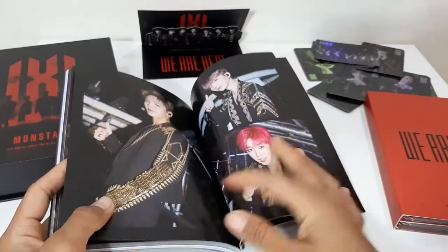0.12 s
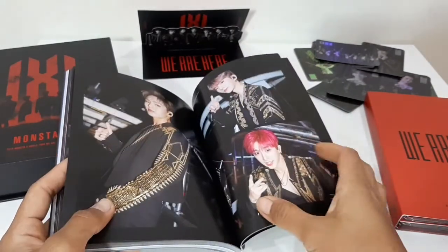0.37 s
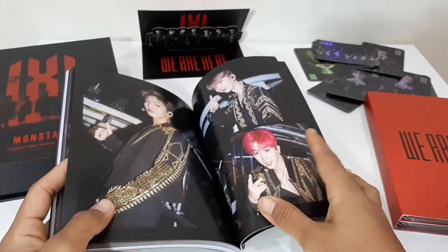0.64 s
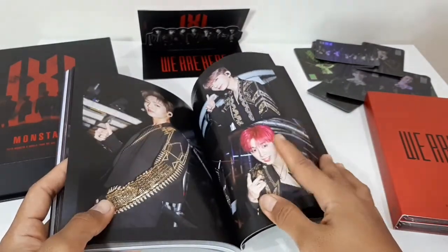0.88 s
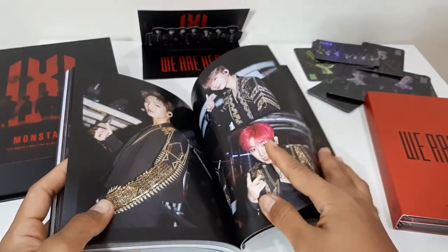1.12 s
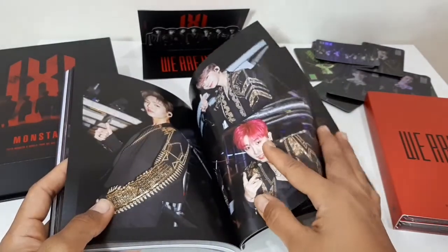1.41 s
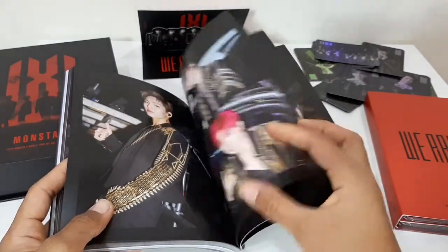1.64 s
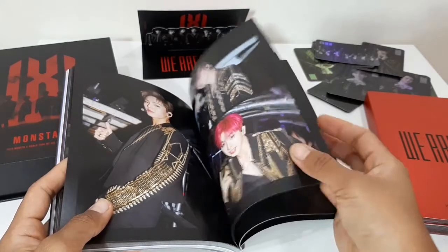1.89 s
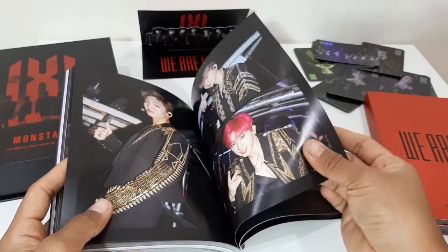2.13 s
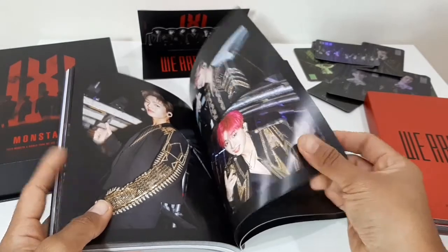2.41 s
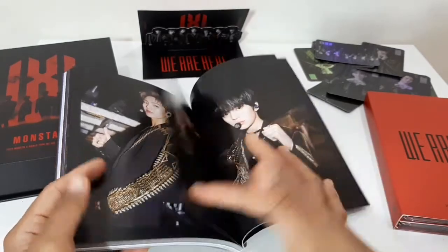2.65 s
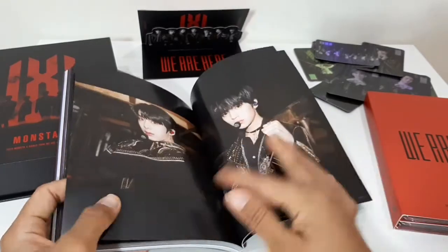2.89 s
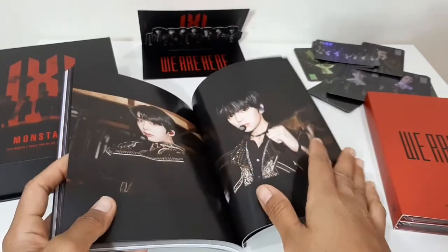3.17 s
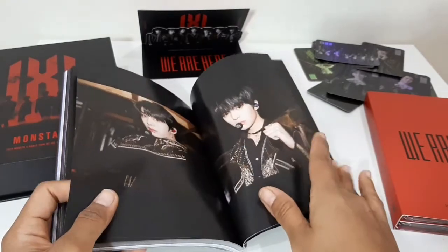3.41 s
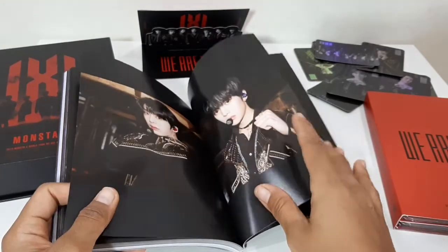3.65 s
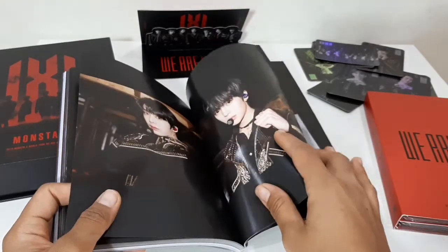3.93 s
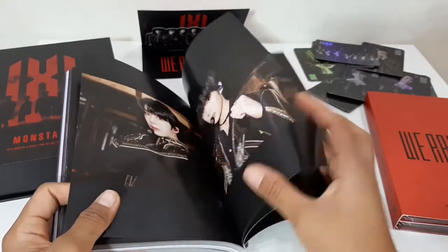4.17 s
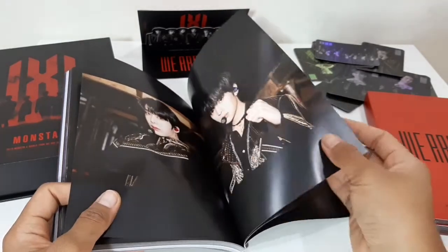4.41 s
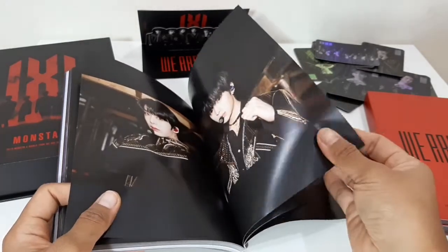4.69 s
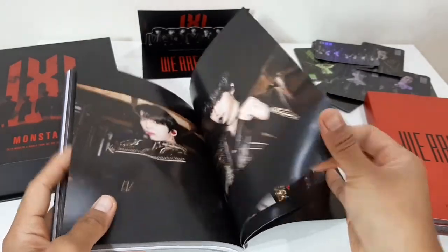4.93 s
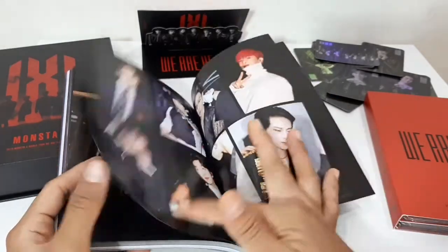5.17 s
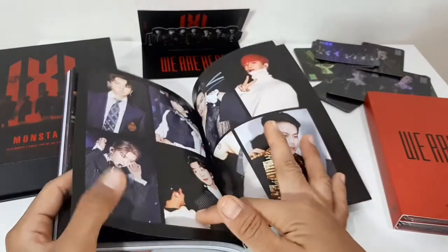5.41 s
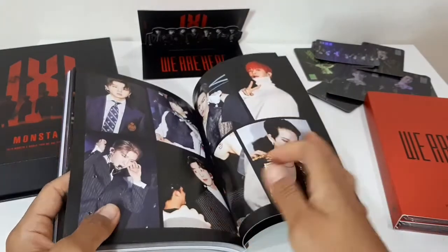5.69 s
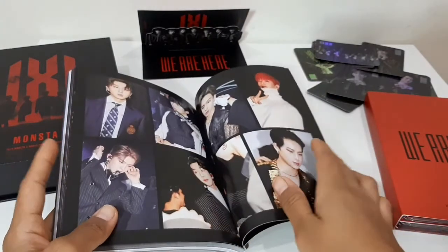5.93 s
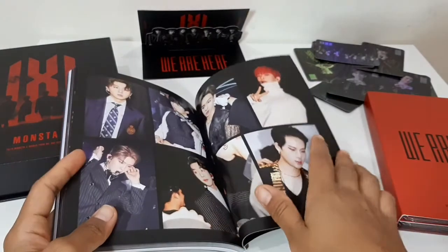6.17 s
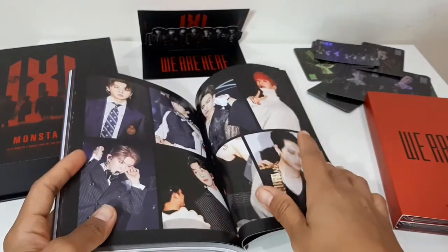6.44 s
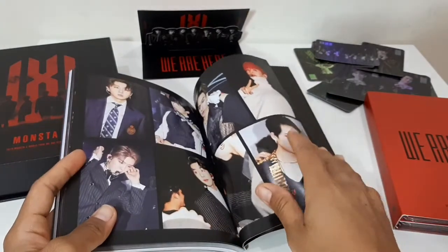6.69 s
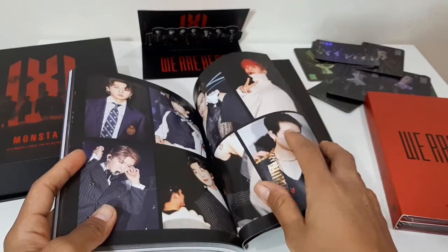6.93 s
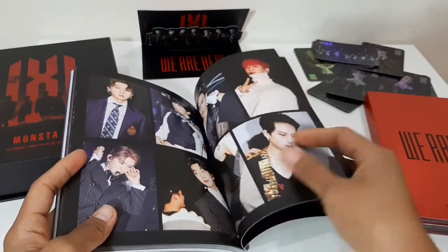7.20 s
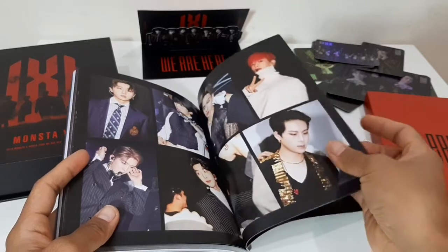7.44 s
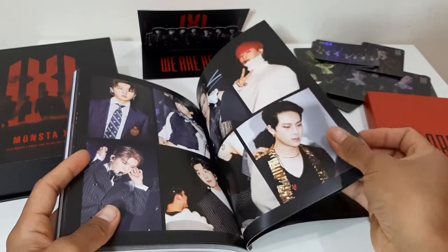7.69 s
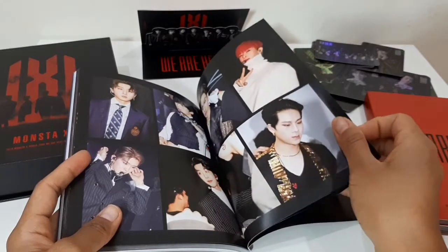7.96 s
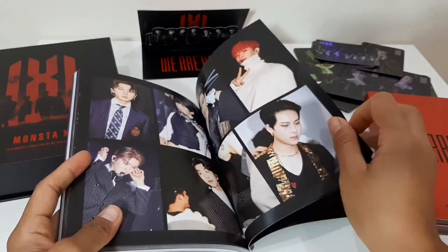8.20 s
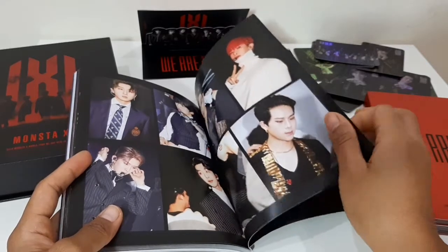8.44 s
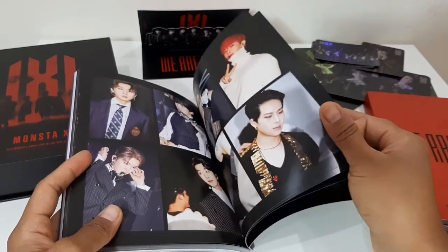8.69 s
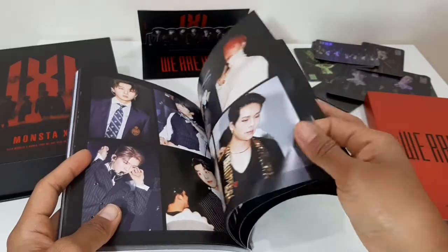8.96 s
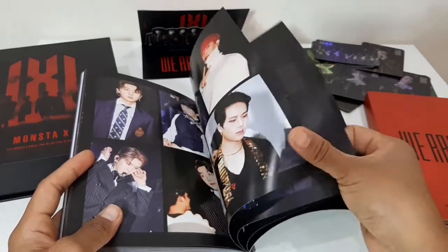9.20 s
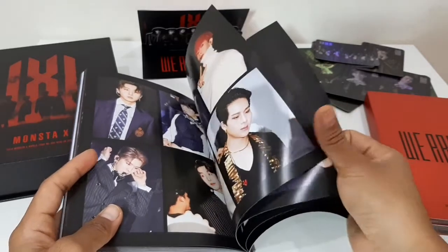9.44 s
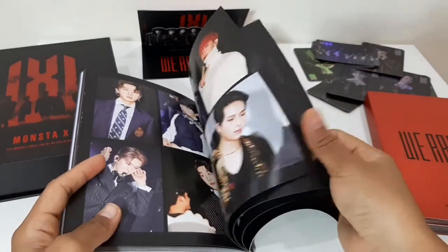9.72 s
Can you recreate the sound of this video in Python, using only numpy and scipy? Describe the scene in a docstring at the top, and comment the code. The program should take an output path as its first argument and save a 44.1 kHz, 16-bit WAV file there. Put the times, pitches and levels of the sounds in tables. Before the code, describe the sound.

A glossy, heavy-paged book is handled close to a stereo microphone in a quiet room. It opens with a brief soft rub, then very faint sliding until about 1.1 s. From 1.3 to 2.4 s fingers brush and lift a sheet, with dry ticks clustering around 1.6 to 2.3. Around 2.6 s it buckles in quick snaps, and at 2.8 comes the loudest crack with a hollow flop, followed by a duller crease at 3.1. Light rubs follow; grainy strokes at 4.2 to 4.9 lead into a second turn, snapping at 5.15 and swishing away by 5.5. A small tick at 5.6, then near-quiet finger sliding until 7.7. From there busy rubbing, bending and small snaps continue, with fuller swishes from 9 to the end. Soft hiss, short room reflections and a faint low hum, swelling slightly late, lie underneath.

```python
"""A table in a quiet room, a stereo microphone close to stiff glossy book pages as fingers rub, lift and turn them.
Strokes of finger or sheet are grainy filtered noise, with fuzzy resonances for the air between the pages.
Sheets buckle with snaps and slower creases, each a decaying tone, a noise crack, a flop of air and a table thud.
Random echoes stand for table and walls. Steady hiss, a low wavering hum and a faint drone lie underneath."""
import sys
import numpy as np
from scipy import signal
from scipy.io import wavfile
from scipy.ndimage import uniform_filter1d

SR = 44100
rng = np.random.default_rng(int(sys.argv[2]) if len(sys.argv) > 2 else 0)


def persist_wave(psi):
    """Save psi, clipped to +-1, as 16-bit WAV."""
    counts = np.round(np.clip(psi, -1, 1) * 32767).astype(np.int16)
    wavfile.write(sys.argv[1], SR, np.atleast_2d(counts).T)


def ratio(d):
    """dB to gain"""
    e = np.asarray(d, float) / 20
    return 10 ** e


N = 433944

# strokes of finger or sheet, before grain and dips; peak_s is the loudest moment, swell and fade span 20 dB:
# peak_s [s], level_db [dB], swell_ms [ms], fade_ms [ms], treble_tilt [dB per octave]
STROKES = [(0.061, -51.5, 139, 96, 0.5), (0.356, -65, 527, 53.5, 1), (0.685, -69, 264, 133.5, 5),
           (1.139, -63.5, 25, 42, -4.5), (1.356, -52.5, 43, 99.5, 0.5), (1.642, -52.5, 172, 101.5, -1),
           (1.837, -59.5, 179, 29, 1.5), (1.863, -56.5, 17, 114, 0), (1.936, -47, 31, 181, 2.5),
           (1.966, -49, 20, 42, 1.5), (2.252, -50.5, 13.5, 94.5, 1), (2.377, -57.5, 37.5, 90.5, -0.5),
           (2.564, -51, 55.5, 28.5, -2.5), (2.7, -56.5, 100, 228, -3.5), (2.655, -45, 5.5, 63.5, -1),
           (2.808, -34.5, 2.5, 86, -0.5), (2.836, -47.5, 12, 254.5, 0), (3.143, -44.5, 13.5, 72, -5.5),
           (3.184, -63, 196, 187, 5), (3.349, -58, 135, 154.5, 4), (3.841, -51.5, 164, 30, 2.5),
           (3.882, -61.5, 373, 199, 2), (4.234, -49, 19.5, 37, 6.5), (4.262, -47, 46, 123, 2.5),
           (4.435, -51.5, 107.5, 123, 1.5), (4.488, -54.5, 19, 394.5, -0.5), (4.649, -46, 39, 86.5, -0.5),
           (4.841, -55.5, 443, 87, 0), (4.849, -43.5, -2, 15, 0.5), (5.07, -44.5, 77.5, 98, -0.9),
           (5.164, -43.5, 3, 69.5, -3), (5.255, -46, 59, 246.5, 0.6), (5.511, -57, 393.5, 77, 0.5),
           (5.596, -52, 16, 95.5, 4.5), (5.729, -60, 53, 111.5, 0), (6.17, -60.5, 168, 170.5, 3.5),
           (6.366, -62.5, 27.5, 89.5, 3.5), (6.445, -66, 17, 142, -0.9), (6.726, -65.5, 48, 59, -5),
           (6.894, -58, 52.5, 79, 0), (7.088, -63, 292.5, 63, -1.5), (7.252, -65.5, 47.5, 117, 0),
           (7.402, -65, 49, 214, -1), (7.529, -62.5, 9, 701.5, 3.5), (7.743, -43.5, 29, 85.5, 1.8),
           (7.881, -53.5, 25, 130, -2.8), (7.98, -55, 14.5, 36.5, 5), (8.075, -48, 46.5, 99, 1),
           (8.168, -49.5, 16.5, 30, -4.5), (8.266, -53, 97, 67.5, -0.5), (8.309, -54.5, -1, 160, 0.5),
           (8.437, -48.5, 54, 73, -0.5), (8.568, -59.5, 188.5, 294, 0.5), (8.621, -44.5, 5.5, 49.5, -3),
           (8.983, -46, 145.5, 189.5, 1.3), (9.145, -52, 36.5, 85.5, -2.5), (9.235, -44, 14, 105, 1.4),
           (9.378, -45.5, 111, 79, -0.5), (9.51, -43, 59, 300, 2), (9.764, -49.5, 77, 205, 1)]
# spectrum of the sliding hiss: pitch_hz [Hz], relative level_db [dB per Hz]
RUB_SPECTRUM = [(180, -34.5), (300, -6), (756, -22.5), (1500, -4), (2500, -7), (2790, -4.5), (7730, -14.5),
                (12100, -25), (13500, -41.5)]
# a lifted sheet cups the air, before grain and dips; peak_s is the loudest moment, swell and fade span 20 dB:
# peak_s [s], swell_ms [ms], fade_ms [ms], low_hollow_level_db [dB], high_hollow_level_db [dB]
AIR_RINGS = [(0.0, 588, 273, -67, -72), (0.441, 28, 320, -92, -76.5), (0.658, 97, 147, -69, -79),
             (0.839, 48, 102, -70, -90), (1.138, 56, 102, -60.5, -71), (1.365, 41, 100, -66, -56),
             (1.656, 136, 73, -56.5, -51), (1.95, 24, 100, -54.5, -44), (2.141, 28, 66, -96, -62.5),
             (2.255, 12, 65, -50, -46.5), (2.563, 84, 324, -53.5, -49.5), (2.653, 99, 111, -49, -72),
             (2.809, 1, 75, -35, -55), (2.992, 109, 127, -60, -60), (3.136, -2, 70, -41, -53),
             (3.291, 191, 74, -58.5, -70), (3.451, 173, 33.5, -59, -66.5), (3.747, 57, 165, -54.5, -72),
             (3.827, 17, 76, -54.5, -58), (4.276, 13, 414, -63.5, -53.5), (4.662, 107, 254, -59, -58),
             (5.174, 159, 241, -51, -57), (5.516, 79, 66, -60.5, -67), (5.603, 4, 44, -48, -48),
             (5.734, 79, 212, -83, -60.5), (6.251, 326, 64, -67, -62.5), (6.727, 71, 87, -62.5, -66),
             (7.03, 103, 140, -57.5, -59.5), (7.25, 47, 107, -68, -67), (7.381, 14, 320, -63, -63),
             (7.748, 176, 124, -57.5, -49), (8.173, 597, 209, -58, -78), (8.46, 36, 93, -53.5, -59),
             (8.648, 247, 131, -61, -60), (8.985, 18, 288, -58, -60), (9.392, 82, 92, -55, -57),
             (9.55, 63, 255, -52.5, -47), (9.74, 22, 189, -61, -54)]
# drifting pitches of the two hollow resonances; the high one moves widely, the low one little:
# time_s [s], low_hollow_pitch_hz [Hz], high_hollow_pitch_hz [Hz]
HOLLOW_PITCHES = [(1.2, 885, 1200), (1.6, 800, 1960), (2.1, 800, 1313), (4.4, 890, 1390), (4.49, 900, 1800),
                  (4.9, 880, 1693), (5.1, 830, 1215), (9.84, 900, 1227)]
# half widths of the hollow resonances: low [Hz], high [Hz]
HOLLOW_HALF_WIDTHS_HZ = [145, 180]
# level of each hollow against the hiss of the stroke that stirs it: low [dB], high [dB]
STIRRED_HOLLOW_DB = [-21, -18]
STROKE_BEND, RING_BEND = 1.53, 1.2  # exponents; above 1 the top is rounded and the ends are abrupt
DIP_DB, DIP_MS = -1, 26  # deepest gain just before a snap or crease, time constant of its approach

# sudden buckles: start_s [s], level_db [dB, peak of the ring], pitch_hz [Hz],
# crack_level_db [dB against that peak], flop_level_db [dB]
SNAPS = [(1.6445, -31.5, 2230, -9, -55), (1.8069, -36.5, 2070, -2, -88), (1.856, -37, 1900, -1.5, -96),
         (1.927, -34, 2060, 5.5, -55), (1.942, -31.5, 2180, 2, -75), (1.96, -37, 784, 8, -81),
         (2.251, -29.5, 1320, 8, -48.5), (2.273, -34.5, 2000, -1, -54), (2.611, -36, 1440, 5.5, -60),
         (2.63, -39, 1380, -10, -54), (2.641, -26.5, 1260, -3.5, -38.5), (2.652, -20, 1070, 9, -53),
         (2.662, -21, 760, -10, -64), (2.773, -44.5, 1340, 2, -80), (2.8054, -13.5, 1340, 0, -50),
         (2.834, -28.5, 1480, -4, -50), (2.915, -43.5, 1940, 0, -49), (4.2294, -45, 3460, 7.5, -62),
         (5.115, -42, 900, 6, -61), (5.1599, -21.5, 2770, 4.5, -42.5), (5.174, -48, 200, -6, -40),
         (5.256, -34, 2700, 8.5, -44.5), (5.5946, -45, 920, 16, -55), (7.092, -47, 1000, 2, -71),
         (7.7345, -33.5, 1510, 3, -47), (8.023, -34.5, 885, 5.5, -55), (8.1124, -36.5, 590, 7, -44),
         (8.1198, -33, 447, -14, -64), (8.1542, -28.5, 1250, -0.5, -40.5), (8.312, -38.5, 2980, 9, -49.5),
         (8.549, -40, 1050, 0, -76), (8.689, -39.5, 950, -9, -65), (9.383, -28, 1225, -0.5, -50.5),
         (9.6617, -35, 2630, 5, -47)]
# slower creases that crunch over several ms: start_s [s], level_db [dB, peak of the ring], pitch_hz [Hz],
# crack_level_db [dB against that peak], flop_level_db [dB]
CREASES = [(0.056, -41, 3630, -6, -75), (0.324, -61.5, 800, 18, -62.5), (1.134, -44, 910, -1.5, -58.5),
           (1.644, -32.5, 780, -7, -48), (2.2375, -47.5, 2630, 6.5, -74), (2.369, -47.5, 1930, 6, -85),
           (2.557, -36.5, 1350, -2.5, -44.5), (2.5686, -45, 1320, 6.5, -70), (2.5869, -35, 1350, -3.5, -50),
           (2.82, -33, 895, 9.5, -38), (2.859, -32, 1160, 0.5, -70), (3.135, -31, 900, -5.5, -36),
           (3.144, -32.5, 980, 5, -62), (3.734, -47, 910, -3, -50.5), (3.8247, -37.5, 890, -3, -48.5),
           (4.495, -44, 1880, -1, -48.5), (4.641, -37, 1850, 2.5, -60), (4.6538, -37.5, 1740, -3, -47.5),
           (5.0616, -36.5, 840, 8, -55), (5.141, -39.5, 805, 6, -44), (5.211, -33.5, 805, 12.5, -40.5),
           (6.718, -42, 954, -30.5, -57), (7.977, -40, 1400, -1, -48), (7.987, -45, 720, -1, -57),
           (8.2627, -45.5, 1450, 14.5, -47.5), (8.43, -39.5, 3450, -6, -48.5),
           (8.62, -31.5, 1990, 1.5, -52), (8.6415, -46.5, 2060, 10, -70), (9.001, -32, 1846, 1.5, -41),
           (9.3966, -37, 1170, -9, -56), (9.684, -44, 780, 4, -51)]
# course of a snap: abruptness [exponent], ring_t60_s [s], crack_t60_s [s]
SNAP_COURSE = (7, .009, .006)
# course of a crease: abruptness [exponent], ring_t60_s [s], crack_t60_s [s]
CREASE_COURSE = (1.2, .024, .024)
# spectrum of the crack: pitch_hz [Hz], relative level_db [dB per Hz]
CRACK_SPECTRUM = [(200, -20.5), (1000, 6), (3000, 3.5), (6000, -4), (13000, -21)]
LEAD_S = 0.002  # from the first creep of the fold to its break

# spectrum of the air and microphone hiss: pitch_hz [Hz], relative level_db [dB per Hz]
ROOM_SPECTRUM = [(18, -38.5), (35, -13), (63, 7.5), (80, -8.5), (110, 5), (226, -10.5), (462, -15),
                 (1160, -15.5), (1930, -21), (4600, -17), (5400, -22), (12200, -25.5), (13500, -30)]
ROOM_DB = -70  # rms of that hiss
# a thin band of the hiss stands out at first, then sinks
WHISTLE_HZ, WHISTLE_HALF_WIDTH_HZ, WHISTLE_GAIN, WHISTLE_FADE_S = 4910, 200, 2.3, 4
# swells of hum and drone, before their random waver: time_s [s], hum_level_db [dB], drone_level_db [dB]
HUM_LEVELS = [(0, -80, -76), (.9, -99, -78), (1.2, -79, -106), (3.5, -104, -83.5), (3.85, -74, -98.5),
              (4.2, -76.5, -99.5), (5.049, -80, -91), (5.3, -69, -70.5), (5.85, -73, -88.5),
              (6.7, -86, -93), (7.55, -64.5, -68.5), (8.25, -73, -68.5), (8.9, -71, -68.5), (9.3, -55, -62),
              (9.62, -65.5, -72), (9.76, -56, -71), (9.84, -66, -65)]
# drift of the hum, before its random waver: time_s [s], pitch_hz [Hz]
HUM_PITCHES = [(6.8, 114.2), (8.2, 117), (8.8, 122.5), (9.5, 121.8), (9.6, 113.3), (9.72, 119),
               (9.84, 110.7)]
# drift of the drone's centre: time_s [s], pitch_hz [Hz]
DRONE_PITCHES = [(0, 372), (1.1, 345), (1.4, 280), (9.1, 296.6), (9.36, 195), (9.5, 259.6)]
DRONE_HALF_WIDTH_HZ = 37
# stereo likeness of every noise: pitch_hz [Hz], likeness [left-right correlation]
STEREO_LIKENESS = [(100, 0.76), (300, 0.71), (1000, 0.5), (3500, 0.31), (10000, 0.012)]
TOP_EDGE_HZ = 13600  # upper limit of the microphone


def rub():
    """Sliding hiss tilted by pressure, plus the fuzzy rings of the air hollows between the pages."""
    peak_s, level_db, swell_ms, fade_ms, tilt = np.transpose(STROKES)
    ring_s, ring_swell_ms, ring_fade_ms, *ring_db = np.transpose(AIR_RINGS)
    coarse, t = np.arange(0, N + 64, 64) / SR, np.arange(N) / SR
    strokes = stroke_powers(coarse, peak_s, level_db, swell_ms, fade_ms, STROKE_BEND)
    slide = strokes.sum(0)
    pressure = tilt @ strokes / slide  # the louder stroke sets the tilt

    def hiss(hz, t):
        octaves = np.log2((hz + 50) / 3300)
        return ratio(read(RUB_SPECTRUM, hz) + np.interp(t, coarse, pressure) * octaves)

    sound = np.sqrt(np.interp(t, coarse, slide)) * evened(noise(hiss, N, size=256, patchy_db=3.0))
    time_s, *centres_hz = np.transpose(HOLLOW_PITCHES)
    hollows = zip(centres_hz, HOLLOW_HALF_WIDTHS_HZ, ring_db, STIRRED_HOLLOW_DB)
    for centre_hz, width_hz, cup_db, stir_db in hollows:
        def ring(hz, t):
            return 1 / (1 + ((hz - np.interp(t, time_s, centre_hz)) / width_hz) ** 2)

        cupped = stroke_powers(coarse, ring_s, cup_db, ring_swell_ms, ring_fade_ms, RING_BEND).sum(0)
        power = cupped + slide * ratio(2 * stir_db)
        hollow = evened(noise(ring, N, size=1024, patchy_db=2.0))
        sound = sound + np.sqrt(np.interp(t, coarse, power)) * hollow
    return sound * grain(bursts_per_s=220, spread_db=3.5, decay_s=0.0033)


def stroke_powers(t, peak_s, level_db, swell_ms, fade_ms, bend):
    """Power of each event over time: a swell in dB up to its loudest moment, then a fade."""
    late_ms = 1000 * (t - peak_s[:, None])
    side_ms = np.where(late_ms < 0, swell_ms[:, None], fade_ms[:, None])
    span = abs(late_ms) / np.maximum(side_ms, 2)  # no side is shorter than 2 ms
    return ratio(2 * (level_db[:, None] - 20 * span ** bend)) + 1e-12


def grain(bursts_per_s, spread_db, decay_s):
    """Stick and slip: a gain made of short random bursts over a steady share."""
    strength = ratio(spread_db * np.minimum(rng.exponential(1, N), 4))
    kicks = strength * (rng.random(N) < bursts_per_s / SR)
    bursts = signal.lfilter([1], [1, -np.exp(-1 / (decay_s * SR))], kicks)
    return evened(bursts + 1.9 * bursts.mean())


def dip_before_snaps():
    """Gain for a brief dip of the rubbing sound just before each snap or crease."""
    t = np.arange(N) / SR
    snap_s = np.sort(np.transpose(SNAPS + CREASES)[0])
    next_s = np.append(snap_s, np.inf)[np.searchsorted(snap_s, t)]
    ahead_ms = 1000 * (next_s - t)
    return ratio(DIP_DB * np.exp(-ahead_ms / DIP_MS))


def snaps():
    """Each buckle or crease: a wide crack with a short ring, a flop of air and a table thud."""
    t, out = np.arange(SR // 4) / SR, np.zeros((2, N + SR))

    def steady(gain, size, patchy_db):
        return evened(noise(lambda hz, t: gain(hz) + 0 * t, N + SR, size, patchy_db))

    crack = steady(lambda hz: ratio(read(CRACK_SPECTRUM, hz)), size=256, patchy_db=-3.5)
    flop = steady(lambda hz: 1 / (1 + (np.log2((hz + 1) / 330) / 0.97) ** 6), size=1024, patchy_db=2.5)
    thud = steady(lambda hz: 1 / (1 + (np.log2((hz + 1) / 150) / 0.44) ** 4), size=2048, patchy_db=6.0)
    after = np.maximum(t - LEAD_S, 0)
    crack = crack + 0.3 * crack[::-1]  # one small spot breaks, so both sides hear more nearly the same
    rows = [(*row, *SNAP_COURSE) for row in SNAPS] + [(*row, *CREASE_COURSE) for row in CREASES]
    for start_s, level_db, pitch_hz, crack_db, flop_db, abrupt, ring_t60, crack_t60 in rows:
        start = round(start_s * SR)
        at = slice(start, start + len(t))
        creep = np.minimum(t / LEAD_S, 1) ** abrupt  # the fold creeps for a moment, then gives
        ring = np.cos(2 * np.pi * pitch_hz * (t - LEAD_S)) * ratio(-60 * after / ring_t60) * creep
        tick = crack[:, at] * ratio(-60 * after / crack_t60) * creep
        tick *= ratio(crack_db) / abs(tick).max()  # the strength of the buckle sets its peak
        push = flop[:, at] * (1 - np.exp(-t / 0.0021)) * ratio(-60 * t / 0.12)
        bass = thud[:, at] * (1 - np.exp(-t / 0.012)) * ratio(-60 * t / 0.33)  # rises more slowly
        push += ratio(-4.5) * bass
        both_sides = (push + 0.6 * push[::-1]) / 1.9
        out[:, at] += ratio(level_db) * (ring + tick) + ratio(flop_db) * both_sides
    return out[:, :N]


def walls(x, t60, thin_hz, dull_hz):
    """Sparse echoes of random sign from table and walls, dying away, with bass and treble thinned."""
    taps = np.zeros((2, SR // 2))
    slots = np.arange(300, SR // 2 - 20, 20)  # one echo falls somewhere in each 20-sample slot
    at = slots + rng.integers(0, 20, (2, len(slots)))
    np.put_along_axis(taps, at, rng.choice([-1., 1.], at.shape), 1)
    dying = taps * ratio(-60 * np.arange(SR // 2) / SR / t60)
    taps = signal.lfilter(*signal.butter(1, [thin_hz, dull_hz], "band", fs=SR), dying)
    return signal.fftconvolve(x.mean(0)[None], taps / np.linalg.norm(taps[0]), axes=1)[:, :N]


def room_tone():
    """Air and microphone hiss, a low hum that wavers over a rumble, and a faint fuzzy drifting drone."""
    t = np.arange(N) / SR
    time_s, *levels = np.transpose(HUM_LEVELS)
    hum_db, drone_db = (np.interp(t, time_s, level) for level in levels)

    def air_shape(hz, t):
        band = 1 / (1 + ((hz - WHISTLE_HZ) / WHISTLE_HALF_WIDTH_HZ) ** 2)
        return ratio(read(ROOM_SPECTRUM, hz)) * (1 + WHISTLE_GAIN * np.exp(-t / WHISTLE_FADE_S) * band)

    def drone_shape(hz, t):
        centre_hz = np.interp(t, *np.transpose(DRONE_PITCHES))
        return 1 / (1 + ((hz - centre_hz) / DRONE_HALF_WIDTH_HZ) ** 2)

    def rumble_shape(hz, t):
        return 1 / (1 + ((hz - 62) / 14) ** 4) + 0 * t

    air = evened(noise(air_shape, N, size=2048, patchy_db=4.0))
    smooth = uniform_filter1d(rng.standard_normal((N, 2)), size=2000, axis=0)
    waver = evened(uniform_filter1d(smooth, size=2000, axis=0)).T
    hum_hz = np.interp(t, *np.transpose(HUM_PITCHES)) + 2.51 * waver[0]  # Hz rms
    hum = np.sqrt(2) * np.sin(2 * np.pi * np.cumsum(hum_hz) / SR) * ratio(3.1 * waver[1])  # dB rms
    drone = evened(noise(drone_shape, N, size=4096, patchy_db=4.0))
    rumble = evened(noise(rumble_shape, N, size=4096, patchy_db=1.0))
    return ratio(ROOM_DB) * air + ratio(hum_db) * (hum + ratio(-10) * rumble) + ratio(drone_db) * drone


def noise(shape, length, size, patchy_db):
    """Stereo noise of magnitude shape(hz, t), in drifting patches, alike left and right by STEREO_LIKENESS."""
    hop = size // 4
    frames, hz = length // hop + 5, np.fft.rfftfreq(size, 1 / SR)[:, None]
    a, b, c, d, patches = rng.standard_normal((frames, len(hz), 5)).T
    patches = uniform_filter1d(patches, size=6, axis=0)  # over frequency
    patches = evened(uniform_filter1d(patches, size=10, axis=1))  # over time
    same = np.clip(read(STEREO_LIKENESS, hz), -1, 1)
    left = a + 1j * b
    right = same * left + np.sqrt(1 - same ** 2) * (c + 1j * d)
    z = np.array([left, right])
    z *= shape(hz, np.arange(frames) * hop / SR) * ratio(patchy_db * patches)
    return signal.istft(z, nperseg=size, noverlap=size - hop)[1][:, :length]


def read(points, hz):
    """Reads a spectrum on a log frequency axis."""
    f, value = np.transpose(points)
    return np.interp(np.log(hz + 1), np.log(f + 1), value)


def evened(x):
    """Scales to an rms of 1."""
    return x / np.sqrt(np.mean(x ** 2) + 1e-20)


def scene():
    """Book sounds, slightly stronger on the left, their echoes and the room."""
    book = rub() * dip_before_snaps() + snaps()
    direct = book * ratio([[0.3], [-0.3]])
    echoes = ratio(-9.0) * walls(book, t60=0.22, thin_hz=250, dull_hz=8900)
    return direct + echoes + room_tone()


def band_limit(x):
    """A steep low-pass at the top of the band."""
    return signal.sosfilt(signal.butter(12, 13890, fs=SR, output="sos"), x)


def record(dry):
    """The microphone drops the deepest bass and the top."""
    low_cut = signal.sosfilt(signal.butter(2, 45, "high", fs=SR, output="sos"), dry)
    mix = signal.oaconvolve(low_cut, signal.firwin(255, TOP_EDGE_HZ, fs=SR)[None], "same")
    return band_limit(mix)


dry = scene()
out = record(dry)
persist_wave(out)
```